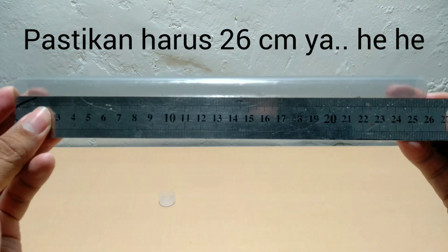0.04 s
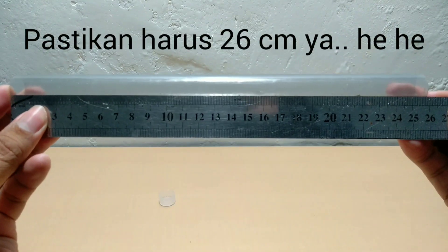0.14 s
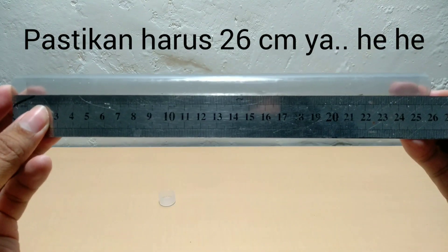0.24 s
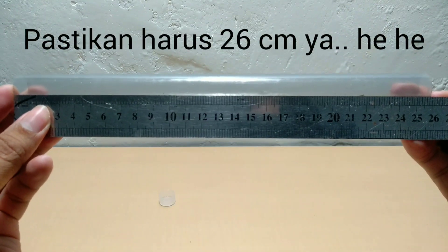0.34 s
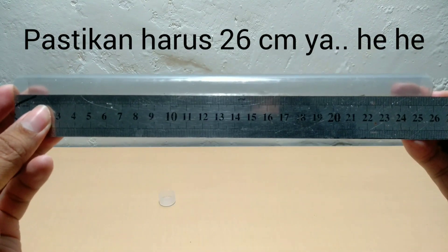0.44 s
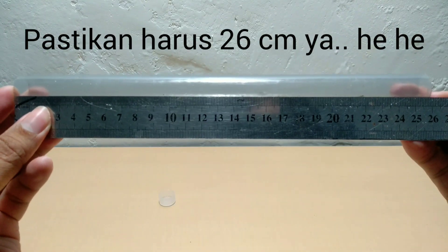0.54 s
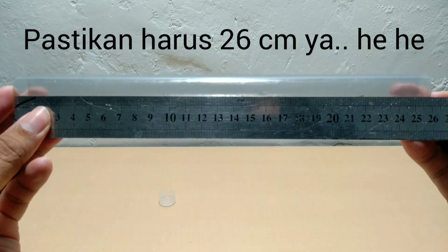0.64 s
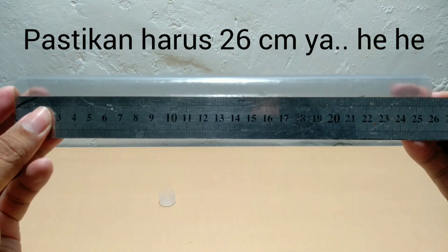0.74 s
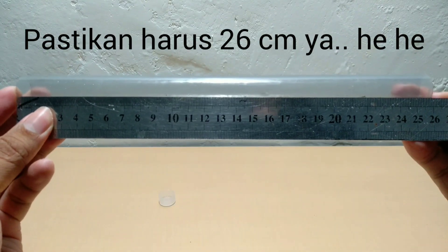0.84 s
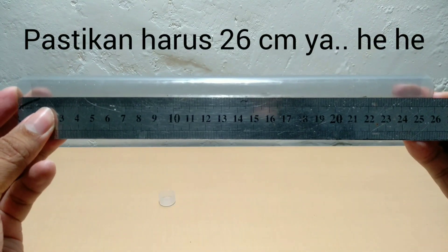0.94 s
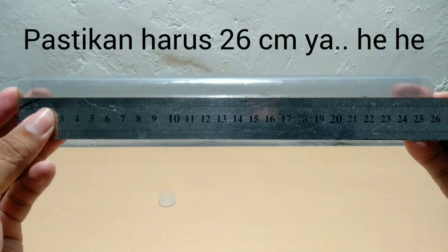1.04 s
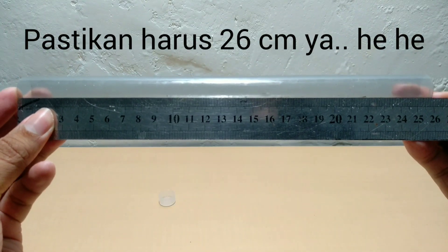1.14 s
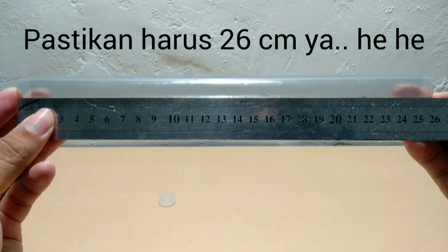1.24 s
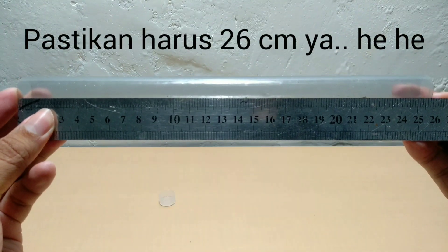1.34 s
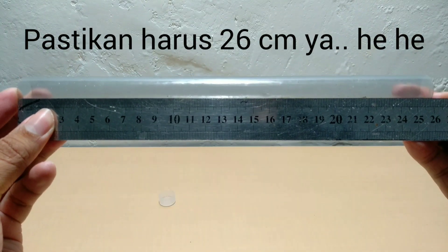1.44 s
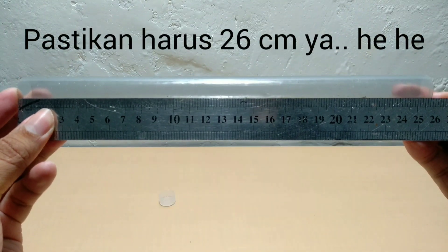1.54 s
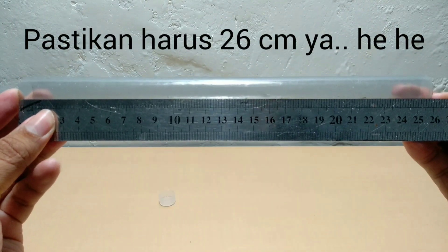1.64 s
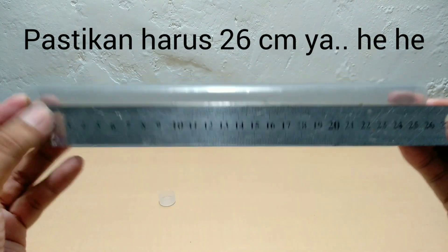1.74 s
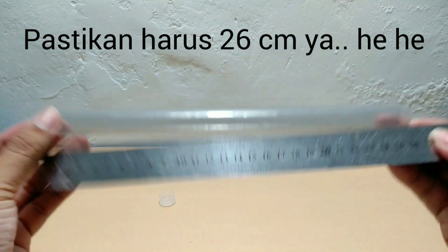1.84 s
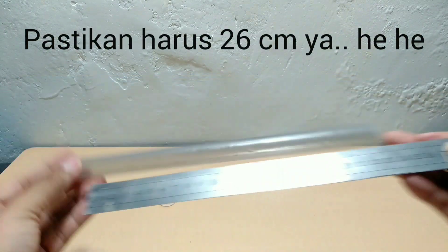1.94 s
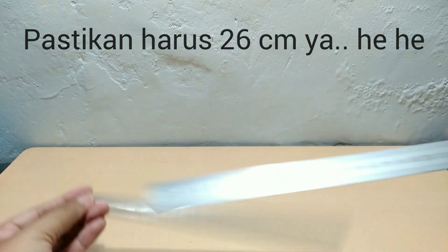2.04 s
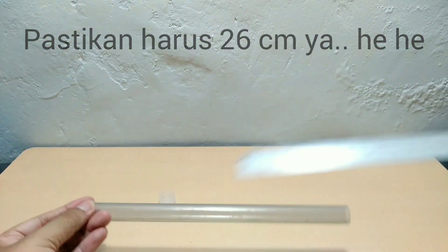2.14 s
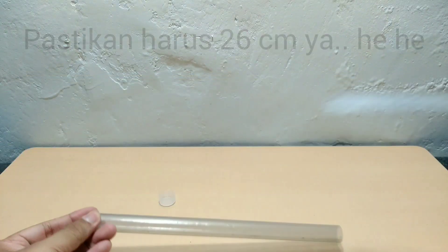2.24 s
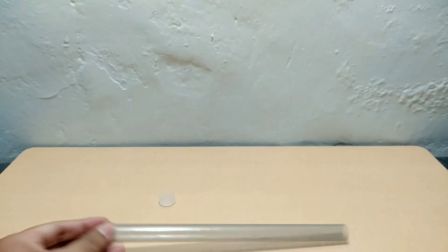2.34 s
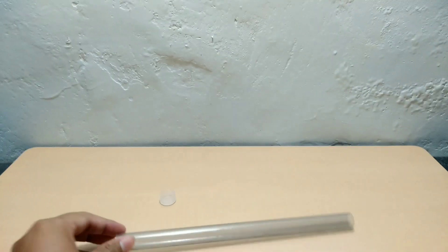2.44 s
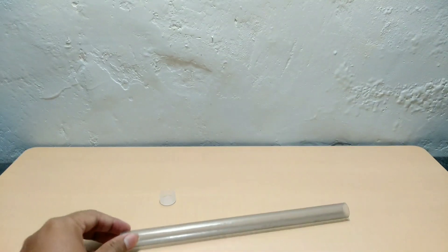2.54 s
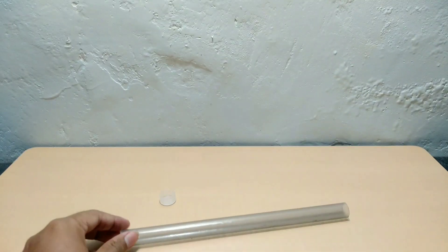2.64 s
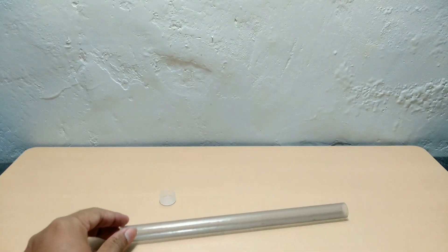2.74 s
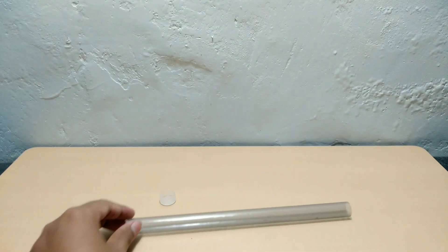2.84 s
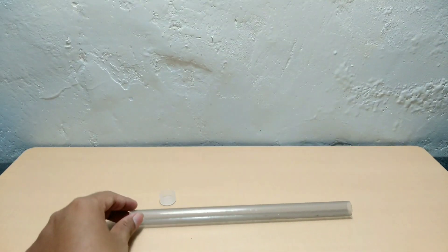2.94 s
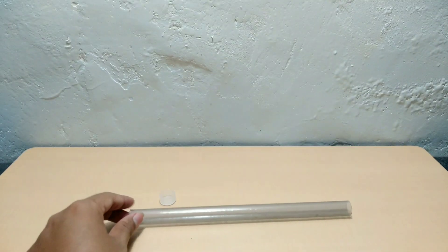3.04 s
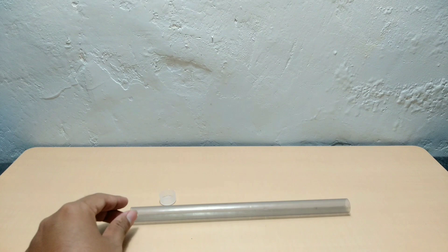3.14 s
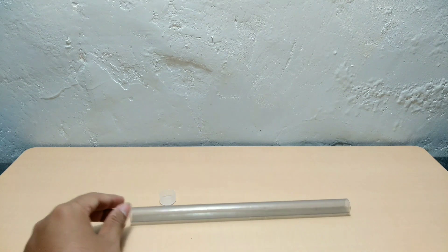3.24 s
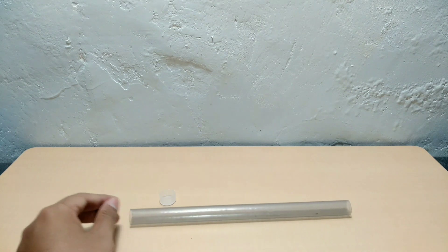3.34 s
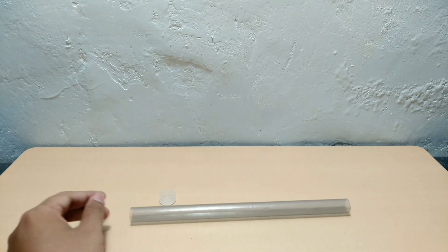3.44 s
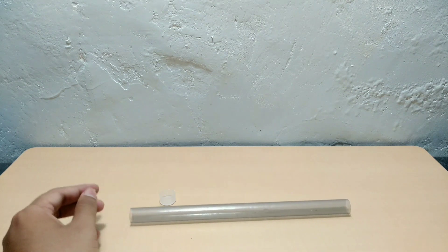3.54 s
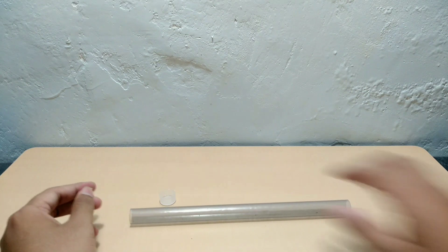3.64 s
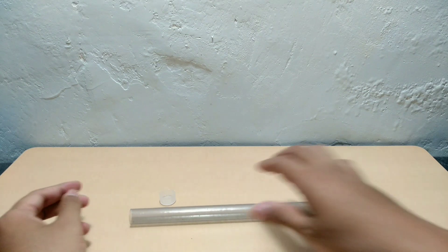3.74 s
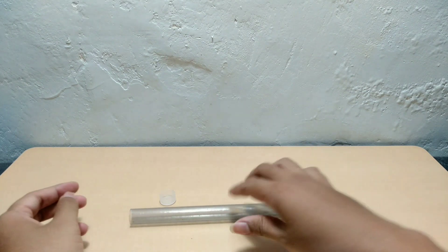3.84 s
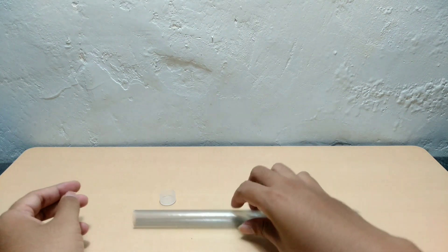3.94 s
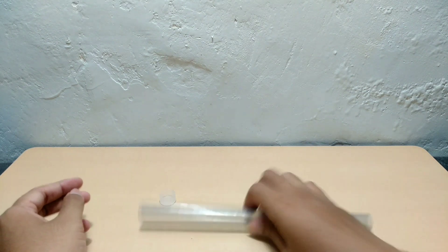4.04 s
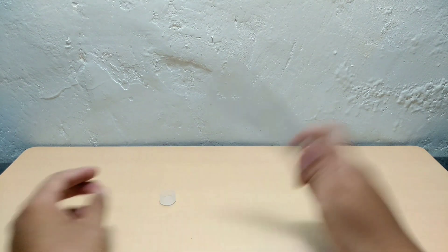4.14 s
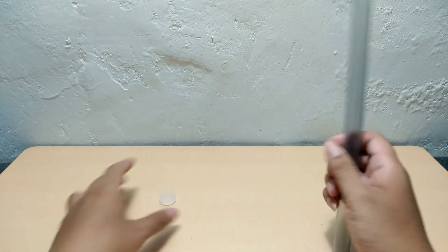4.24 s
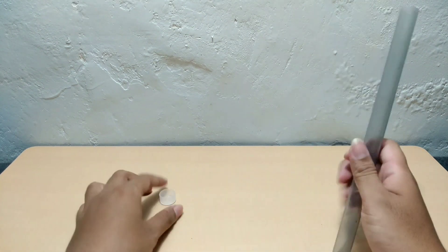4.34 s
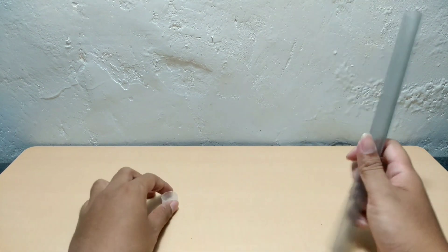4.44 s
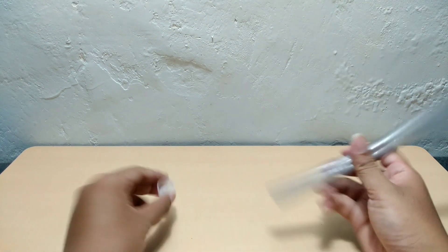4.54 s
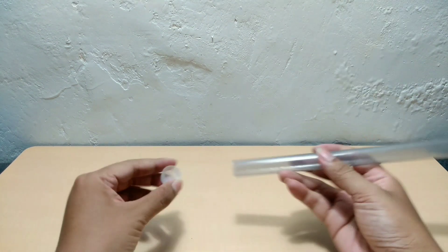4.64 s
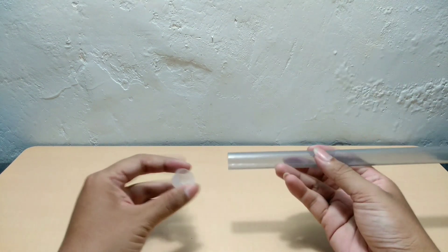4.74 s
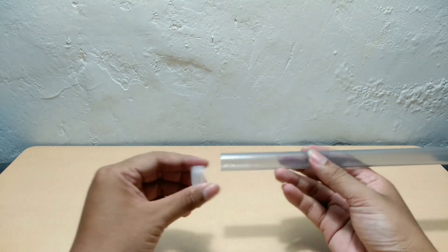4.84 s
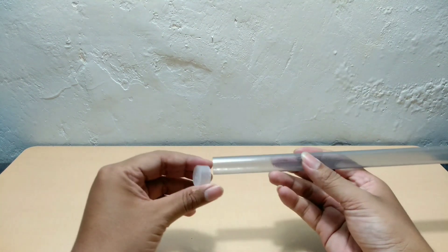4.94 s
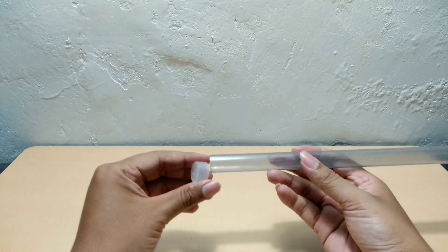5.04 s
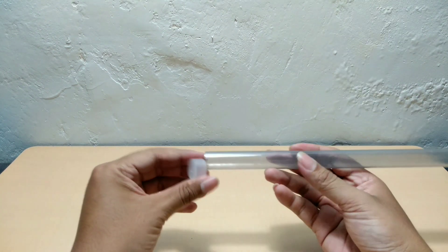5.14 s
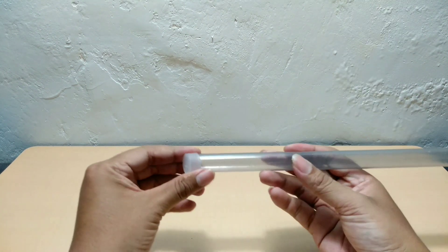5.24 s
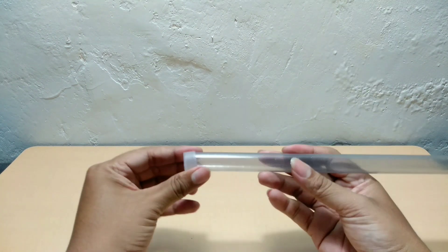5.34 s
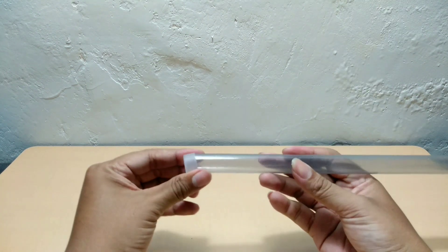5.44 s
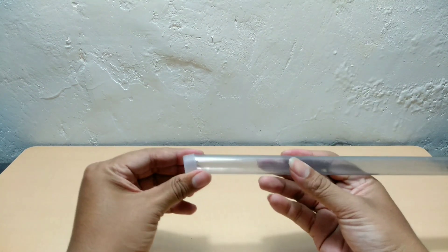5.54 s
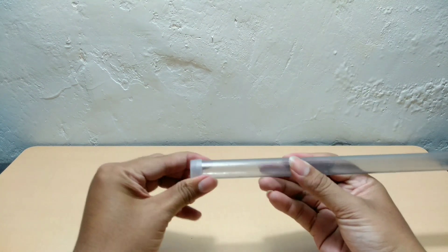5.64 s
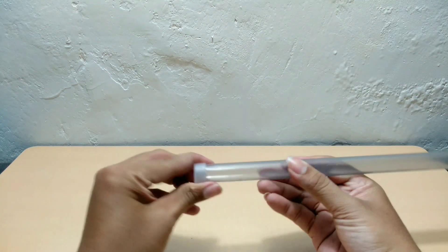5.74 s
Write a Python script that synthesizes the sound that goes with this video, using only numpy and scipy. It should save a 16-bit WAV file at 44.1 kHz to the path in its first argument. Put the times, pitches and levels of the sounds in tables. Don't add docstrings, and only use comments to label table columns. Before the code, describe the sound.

Hands hold a steel ruler and thin plastic pipe with faint ticks and rubs, then part them in two hard metallic clacks. Soft table knocks and brushing follow, a pipe lands flat with a woody slam, fingers fumble, and a cap clicks on with a hollow pop. Small hard room, close phone microphone, low rumble and flickering hiss.

```python
import sys
import numpy as np
from scipy import signal
from scipy.fft import rfft, irfft, next_fast_len
from scipy.io import wavfile
from scipy.ndimage import uniform_filter1d

SR = 44100
rng = np.random.default_rng(int(sys.argv[2]) if len(sys.argv) > 2 else 0)


def bounce(signal):
    frames = np.transpose(np.atleast_2d(signal))
    limited = np.clip(frames, -1, 1)
    pcm = np.round(limited * 32767).astype(np.int16)
    wavfile.write(sys.argv[1], SR, pcm)


def magnitude_from_level(level_db):
    exponent = np.asarray(level_db, float) / 20
    return 10 ** exponent


N = 254765

# start in seconds, peak in dB, softness in dB, left minus right in dB,
# ring length as a factor.
RULER_HITS = [
    (0.769, -40, -9, 7, 0.53),
    (1.914, -29, 8, -0.5, 0.5),
    (1.9288, -9, -1.5, -0.5, 0.68),
    (2.073, -36, -3, 1, 0.77),
    (2.0917, -13.5, -3, -1.5, 0.72),
    (2.135, -17, 0, -1, 0.94),
]
TABLE_HITS = [
    (2.349, -33, 0, -1.5, 0.84),
    (3.479, -45, 22, 1, 0.32),
    (3.833, -26, 2.5, 1, 0.63),
    (3.909, -45, -10, -0.5, 0.43),
    (4.07, -30, 0, 0.45, 0.46),
    (4.278, -42, 8, 1, 0.78),
    (4.345, -44, -6, 1, 0.88),
    (4.454, -36, -13, 1, 0.34),
    (4.596, -43, -16, -1.5, 0.35),
]
SLAM_HITS = [
    (4.062, -13, 0.5, 0.5, 0.5),
    (3.9262, -28, -10, -0.5, 0.38),
]
PIPE_TAPS = [(0.4895, -53, -14, 2, 0.39), (0.786, -52.5, -10, 4, 1), (1.293, -52, 6, 1, 0.94),
             (3.792, -48.5, -8, -1.5, 0.86), (4.328, -54, -6, 18, 1), (4.389, -59, -6, 2, 0.9),
             (4.474, -59, -4, -9, 0.98), (4.479, -49.5, -1, 14, 0.99), (4.609, -55, 1, 18, 0.83),
             (4.729, -67, 1, 11, 0.48), (5.291, -54, 11, 8, 0.18)]
CAP_HITS = [
    (5.414, -28.5, 21, 3, 0.79),
    (5.426, -24.5, -6, 2.5, 0.33),
    (6.5, -44.5, 6, 6, 0.31),
    (5.4195, -34, 17, 1, 0.55),
    (5.439, -43, 18, 1, 0.46),
]
POP_HITS = [
    (5.5632, -32, 0, 1, 0.45),
    (5.5727, -35, 0, 1, .4),
]
PING_HITS = [
    (3.011, -39.5, 0, 4.8, 1),
]
TICKS = [
    (0.5112, -28.5, 7, 4, 0.93),
    (1.151, -46.5, 0, -9, 0.92),
    (1.674, -42, -4, 2, 0.33),
    (3.1564, -35, 0, -8, 0.64),
    (3.8327, -26, 0, -4, 0.26),
    (3.9276, -35, 0, -12, 0.92),
    (4.2785, -32, -8, 0, 0.52),
    (5.426, -52, -1, -1, 0.64),
]

# frequency in Hz, level in dB, 60 dB decay in seconds.
RULER_MODES = [(139.6, 1.5, 0.037), (292, -8.5, 0.053), (517, -6, 0.046), (736, -0.5, 0.035),
               (917, -3, 0.02), (1110, -8.5, 0.027), (1354, -1.5, 0.016), (2630, -9.5, 0.042),
               (3190, 0, 0.014), (3590, 3.5, 0.0087), (3863, 2.5, 0.023), (4440, 1, 0.0074),
               (5600, -14, .01), (8350, -7.5, 0.016), (9380, -6, 0.015), (10100, -8.5, 0.023)]
TABLE_MODES = [(124, 6.5, 0.038), (293, -1.5, 0.075), (510, -12.5, 0.16), (766, 0, 0.037), (994, -3, 0.048),
               (1104, -3.5, 0.025), (1320, -4.5, 0.022), (1980, -25, 0.017), (2760, -18, 0.038),
               (3330, -16, 0.021), (3600, -18, 0.063), (4430, -11, 0.015)]
# frequency in Hz, level in dB, 60 dB decay in seconds.
SLAB_MODES = [(143, -7, 0.05), (305, -5.5, 0.096), (542, -4, 0.059), (757, -3, 0.039), (930, 1.5, 0.025),
              (1050, -3.5, 0.033), (1190, -11, 0.03), (1305, -12, 0.035), (1710, -18, 0.027),
              (2164, -17, 0.044), (2530, -12, 0.05), (3160, -10, 0.015), (3600, -20, .015),
              (4468, -24, 0.022)]
OPEN_PIPE_MODES = [(313, -9, 0.034), (754.5, -2, 0.12), (1270, -11, 0.038)]
# frequency in Hz, level in dB, 60 dB decay in seconds.
CAPPED_PIPE_MODES = [(288, 1.5, 0.026), (324, 7.5, 0.036), (533, -4, .02), (980, -12, 0.079),
                     (1634, -11, 0.067), (2290, -4, 0.03), (3650, -30, 0.012), (4750, -15, 0.0037)]
SEATED_PIPE_MODES = [(345, 0, 0.1), (540, -20.5, .08), (760, -13, 0.042), (1003, -13.5, 0.077),
                     (1666, -21, 0.08), (2240, -32, 0.06)]
PING_MODES = [(2196, -32, .17), (3622, 0, .055), (6070, -9, .04), (8372, -30, .24)]
# frequency in Hz, level in dB, 60 dB decay in seconds.
EDGE_MODES = [(1400, -11, 0.014), (2940, -5.5, 0.01), (3890, 3.5, 0.011), (6100, 7.5, 0.0082),
              (8970, 3.5, 0.0047), (12250, 0, 0.0027)]

# peak time in
# seconds, peak in dB, frequency in Hz, rise in seconds, 60 dB decay in seconds.
RINGS = [(0.513, -42, 6100, .001, .02), (0.514, -44, 3950, .002, .04), (1.681, -44, 3850, .003, 0.028),
         (1.683, -53, 1590, .002, .03), (1.916, -32, 760, .001, .03), (1.9215, -32, 1050, .001, 0.013),
         (2.079, -37, 760, 0.0009, .015), (2.083, -35, 800, .001, 0.012), (3.038, -58, 2216, .008, .2),
         (3.07, -59, 8372, .02, .2), (3.16, -49, 5600, .003, .03), (3.836, -45, 2350, .001, .025),
         (4.096, -38.5, 330, 0.0045, .03), (4.2805, -33, 8000, .0015, .02), (4.281, -39, 5800, .005, .04),
         (4.281, -40, 9000, .002, .03), (4.28, -38, 95, .003, 0.072), (4.331, -47, 733, .003, .04),
         (4.346, -37.5, 307, 0.0024, .04), (4.392, -41.5, 311, .004, .08), (4.456, -38, 311, .004, .06),
         (4.457, -42, 760, .004, 0.033), (4.47, -45, 310, .003, .05), (4.592, -48, 680, .003, .05),
         (4.612, -47.5, 330, .008, .05), (4.613, -50, 730, .003, .06), (4.734, -47, 326, .005, .06),
         (5.295, -48, 748, 0.0017, .05), (5.43, -38.5, 1655, .004, 0.063), (5.481, -49.5, 150, .004, .05),
         (1.9313, -21, 3900, .0005, .01), (1.934, -30, 3200, .001, .015), (1.9325, -26, 800, .001, .015),
            (1.9285, -30, 4500, .001, .01), (2.094, -25, 3800, .0008, .012), (2.096, -29, 3100, .001, .012),
            (2.074, -38, 1200, .002, .02), (2.147, -40, 3850, .002, .03), (2.162, -42, 3850, .003, .03),
            (3.799, -48, 770, .005, .04), (3.846, -40, 130, .004, .05), (3.93, -35, 900, .002, .025),
            (3.931, -40, 2850, .002, .02), (3.929, -42, 1600, .002, .02), (4.0648, -23, 1020, .0007, .008),
            (4.0677, -24, 900, .0008, .008), (4.0717, -24, 550, .001, .012), (4.065, -36, 3300, .001, .012),
            (5.4215, -36, 520, .001, .012), (5.426, -38, 600, .002, .015), (3.03, -62, 3622, .006, .18),
            (1.152, -48, 7800, .001, .02)]

# peak time in seconds, peak in dB, centre in Hz, left minus right in dB, fall in seconds.
CATCHES = [(0.513, -33.5, 9300, 1.5, 0.028), (0.776, -40, 6500, 2, 0.036), (1.297, -43, 6300, -0.5, 0.049),
           (1.9208, -22, 9200, -1, 0.025), (2.0844, -26, 9400, -2.5, 0.019), (2.136, -31.5, 8500, 0, 0.043),
           (3.8347, -36, 6000, 4, 0.017), (3.9263, -30, 6900, 1.5, 0.014), (4.281, -34, 8000, 1, 0.019),
           (4.708, -44, 10300, 2.5, 0.034), (5.4271, -31.5, 8000, 0.5, 0.013),
           (5.5741, -31, 13000, 1, 0.011)]
BRUSHES = [(0.0194, -58, 3190, 0, 0.0051), (1.6844, -42, 9000, 0.5, 0.03),
           (2.354, -40.5, 8900, -0.5, 0.029), (2.5494, -57, 6800, -5, 0.017), (2.9003, -54, 6830, 0, 0.013),
           (2.9644, -44.5, 10900, 1, 0.032), (3.162, -32, 11500, 0.5, 0.017), (3.3994, -51, 4360, 1, 0.023),
           (3.7798, -35, 11000, 0, 0.033), (4.3192, -44, 12800, 1, 0.069), (4.4843, -41, 5600, 0, 0.028),
           (5.0397, -47.5, 7140, -1, 0.039), (5.374, -39.5, 10000, 1.5, 0.042)]
SWISHES = [
    (0.3294, -53, 7050, -5, 0.012),
    (0.9694, -54.5, 9000, -5, 0.024),
    (1.16, -43, 7660, -2, 0.022),
    (1.556, -48, 8700, -1.5, 0.03),
    (2.2358, -44, 10100, 7, 0.014),
    (3.562, -47.5, 8650, -1.0, 0.035),
    (4.392, -45, 8000, -1, 0.039),
    (4.552, -45, 9000, -3, 0.019),
    (5.3294, -41, 6900, -1, 0.024),
]
# frequency in Hz, density in dB per Hz.
RUB_COLOUR = [(290, -57), (500, 12.5), (771, 18.5), (1110, 0), (1370, 6), (3460, -2.5), (3940, -3),
              (7130, -3), (12000, -6.5), (15800, -14)]

# peak time in seconds, peak in dB, rise in seconds,
# fall in seconds (each spans 20 dB), upper modes in dB.
DRAGS = [(2.978, -60, .1, 0.011, 0.5), (3.018, -64, 0.012, 0.0053, 16), (3.48, -53, 0.022, 0.093, -4),
         (3.808, -51.5, 0.051, 0.018, 7), (3.829, -53, .014, 0.0054, 2), (4.09, -52, .006, 0.061, 1),
         (4.43, -54, .06, .06, 3), (4.65, -58, .06, .08, 3), (4.375, -56, .05, .06, 8),
         (4.24, -52.5, 0.033, 0.059, -1), (4.325, -56, 0.026, 0.068, 10), (4.347, -50, 0.031, 0.036, -5),
         (4.394, -52, 0.053, 0.051, -3), (4.47, -46.5, 0.034, 0.075, 6), (4.606, -53, 0.032, 0.06, 7),
         (4.737, -53.5, 0.049, 0.08, -1.5), (5.297, -53.5, 0.013, .05, 11), (5.33, -60, 0.025, 0.14, 5),
         (5.366, -56.5, 0.023, .08, 8), (5.599, -47.5, 0.016, 0.04, -5), (5.644, -66.5, .05, 0.19, 7)]
# frequency in Hz, width in Hz, level in dB.
DRAG_BODY = [(309, 150, -0.5), (487, 27, -9.5), (756, 146, -12), (1120, 93, -25.5)]

# time in seconds, level in dB.
RUMBLE = [(0.0, -64), (0.3, -70.5), (0.66, -60), (0.92, -90), (1.19, -65), (1.51, -70), (1.9, -59.5),
          (2.36, -64.5), (3.2, -66.5), (3.44, -60.5), (3.83, -66), (3.96, -74), (4.25, -55), (4.43, -60),
          (4.7, -64), (5.15, -68.5), (5.42, -61.5), (5.78, -70)]
# frequency in Hz, width in Hz.
DRONES = [(128, 25.6), (172, 28)]
# time in seconds, rise in dB, half length in seconds.
LOWER_SWELLS = [(0.2, 8.5, .35), (0.794, 11.5, 0.24), (1.22, 17, 0.11), (1.7, 4.5, 0.55),
                (2.307, 11.5, 0.12), (3.922, 8.5, 0.14), (4.33, 13, 0.12), (5.42, 5.5, 0.16)]
UPPER_SWELLS = [(0.45, 9.3, 0.12), (1.55, 11.5, 0.15), (1.94, 8.9, 0.19), (2.36, 14.5, 0.046),
                (2.9, 7.2, 0.35), (3.97, 12, 0.082), (4.36, 14, 0.13), (4.7, 17, 0.077), (4.95, 13, 0.18),
                (5.75, 3.6, 0.11)]
RUSTLES = [(1.33, -2.5, 0.18), (2.22, 6, 0.13), (3.0, 2.5, 0.38), (3.83, 5, 0.15), (4.07, 8.5, 0.03),
           (4.7, 4, 0.044), (5.2, 1.5, 0.11)]
# frequency in Hz, density in dB per Hz.
RUMBLE_COLOUR = [(12, -67), (20, -43), (75, -1), (130, -9.5), (178, -6.5), (204, -20), (300, -21),
                 (390, -37.5), (660, -120)]
HISS_COLOUR = [(140, -15.5), (210, -7), (290, -4), (430, -7.5), (520, -8), (600, -12.5), (1100, -13),
               (2400, -15), (3800, -17), (5200, -20.5), (8000, -17), (10500, -21), (13000, -25),
               (15900, -26)]
# frequency in Hz, correlation from -1 to 1.
AIR_LIKENESS = [(60, 0.79), (130, 0.77), (290, 0.59), (640, 0.32), (1410, -0.23), (3100, -0.02),
                (6820, 0.0), (15000, -0.01)]

# frequency in Hz, gain in dB.
PORT_COLOUR = [(4500, 0.5), (6500, -4), (9500, 0.5), (13600, -5.5), (15300, 5)]
# frequency in Hz, spread in dB.
GATE_PATCHES = [(400, 0.9), (1500, 4), (5000, 4), (13000, 3.5)]


def unit(x):
    return x / np.sqrt(np.mean(x ** 2))


def on_log(hz, table):
    f, v = np.transpose(table)
    return np.interp(np.log(hz + 1), np.log(f), v)


def shape(x, gain_at):
    n = next_fast_len(x.shape[-1], real=True)
    hz = np.arange(n // 2 + 1) * SR / n
    return irfft(rfft(x, n) * gain_at(hz), n)[..., :x.shape[-1]]


def resonance(f, hz, width):
    return 1 / (1 + (2 * (f - hz) / width) ** 2)


def decay(t, t60):
    return np.exp(-np.log(1000) * t / t60)


def walk(rate_hz):
    hold = int(SR / rate_hz)
    return uniform_filter1d(np.repeat(rng.standard_normal(N // hold + 1), hold), hold)[:N]


def swells(rest_db, table):
    t = np.arange(N) / SR
    return rest_db + sum(db * np.exp(-((t - s) / half) ** 2) for s, db, half in table)


def add(out, s, pair, pan_db):
    i = int(s * SR)
    a, b = max(i, 0), min(i + pair.shape[1], N)
    out[:, a:b] += pair[:, a - i:b - i] * magnitude_from_level(np.array([[pan_db], [-pan_db]]) / 2)


def blows(hits, modes, bass, treble, push_s, clatter, crack_db, crack_hz, crack_s,
          stray=0.007, swing=-1, lag_s=0):
    out, t = np.zeros((2, N)), np.arange(SR // 4) / SR
    hz, db, t60 = np.transpose(modes)[:, :, None]
    since = np.maximum(t - lag_s * (hz > 2000), 0)
    push = 1 - np.exp(-since / push_s)
    signs = swing ** np.arange(len(modes))[:, None]
    chance = rng.standard_normal((len(hits), 3, len(modes), 1))
    noise = rng.standard_normal((len(hits), 3, len(t)))
    for (s, peak_db, soft_db, pan_db, ring), (size, detune, turn), hiss in zip(hits, chance, noise):
        bass_db = bass[0] + bass[1] * soft_db
        treble_db = treble[0] - treble[1] * soft_db
        tilt = [(150, bass_db), (450, 0), (1500, 0), (4000, treble_db)]
        ringing = magnitude_from_level(db + size + on_log(hz, tilt)) * decay(since, t60 * ring) * push * signs
        phase = 2 * np.pi * hz * (1 + stray * detune) * since
        skew = np.tanh(turn) * np.minimum((hz + 150) / 2200, 1.1)
        body = -np.array([(ringing * np.sin(phase + k * skew)).sum(axis=0) for k in (1, -1)])
        chatter = hiss[2] ** 3 * np.exp(-t / 0.0061) * clatter
        chatter[0] = 1
        body = signal.fftconvolve(body, chatter[None], axes=1)[:, :len(t)]
        body /= np.abs(body).max()
        crack = shape(hiss[:2], lambda f: f / crack_hz / (1 + (f / crack_hz) ** 4))
        crack *= np.exp(-t / (crack_s * ring)) * magnitude_from_level(crack_db + treble_db)
        add(out, s + 0.001022, magnitude_from_level(peak_db) * (body + crack), pan_db)
    return signal.sosfilt(signal.butter(3, 105, "high", fs=SR, output="sos"), out)


def ruler_knocks():
    return blows(RULER_HITS, RULER_MODES, (-3, 0), (0, 1), push_s=0.0003, clatter=0.0054,
                 crack_db=-11, crack_hz=9000, crack_s=0.0098, swing=0.97, lag_s=0.001)


def table_knocks():
    return blows(TABLE_HITS, TABLE_MODES, (0, 1), (1.5, 0), push_s=0.00086, clatter=0.0079,
                 crack_db=-5.5, crack_hz=2000, crack_s=0.0095)


def pipe_slams():
    return blows(SLAM_HITS, SLAB_MODES, (0, 1), (0, 0), push_s=0.0003, clatter=0.002,
                 crack_db=-20, crack_hz=2500, crack_s=0.006, swing=0.98)


def pipe_taps():
    return blows(PIPE_TAPS, OPEN_PIPE_MODES, (0, 1), (-4, 0), push_s=0.0032, clatter=0.0037,
                 crack_db=-30, crack_hz=2500, crack_s=0.004)


def cap_knocks():
    return blows(CAP_HITS, CAPPED_PIPE_MODES, (-10, 0.8), (0, 1), push_s=0.00059, clatter=0.028,
                 crack_db=1.5, crack_hz=3400, crack_s=0.0018)


def cap_pop():
    return blows(POP_HITS, SEATED_PIPE_MODES, (0, 0), (0, 0), push_s=0.0043, clatter=0.001,
                 crack_db=-30, crack_hz=3000, crack_s=0.004, swing=1)


def ping():
    return blows(PING_HITS, PING_MODES, (0, 0), (0, 0), push_s=0.012, clatter=0,
                 crack_db=-40, crack_hz=3000, crack_s=0.004, stray=0)


def edge_ticks():
    return blows(TICKS, EDGE_MODES, (-9, 1), (-0.7, 0), push_s=0.0001, clatter=0.034,
                 crack_db=-19.5, crack_hz=8000, crack_s=0.0054)


def rings():
    out = np.zeros((2, N))
    for s, peak_db, hz, rise, t60 in RINGS:
        t = np.arange(-int(3 * rise * SR), int(t60 * SR)) / SR
        swell = np.where(t < 0, np.exp(-(t / rise) ** 2), decay(t, t60))
        skew = min(hz / 4000, 0.8) * np.array([[1], [-1]])
        add(out, s + t[0], magnitude_from_level(peak_db) * swell * np.cos(2 * np.pi * hz * t + skew), 0)
    return out


def rubs():
    out, t = np.zeros((2, N)), np.arange(-SR // 10, SR // 5) / SR
    kinds = [(CATCHES, 0.013, 1.57), (BRUSHES, 0.023, 1.57), (SWISHES, 0.017, 25)]
    slips = sorted((*row, rise, below_db) for table, rise, below_db in kinds for row in table)
    noise = rng.standard_normal((len(slips), 2, len(t)))
    sizes = rng.exponential(size=(len(slips), len(t)))
    for (s, peak_db, hz, pan_db, fall, rise, below_db), pair, size in zip(slips, noise, sizes):
        above_db = max(below_db, 8.5)

        def colour(f):
            loss_db = np.where(f < hz, below_db, above_db) * np.log2((f + 1) / hz) ** 2
            return magnitude_from_level(on_log(f, RUB_COLOUR) - loss_db)

        grains = (pair + 0.25 * pair[::-1]) * magnitude_from_level(2.2 * np.minimum(size, 7))
        swell = np.where(t < 0, np.exp(-(t / rise) ** 2), np.exp(-t / fall))
        add(out, s + t[0], unit(shape(grains, colour)) * swell * magnitude_from_level(peak_db - 11.5), pan_db)
    return out


def drag():
    slips = rng.standard_normal(N) * magnitude_from_level(2.0 * walk(50))

    def ring(body):
        return shape(slips, lambda f: sum(magnitude_from_level(db) * resonance(f, hz, w) for hz, w, db in body) * f / (f + 90))

    low, high = ring(DRAG_BODY[:2]), ring(DRAG_BODY[2:])
    time, gain = np.arange(N) / SR, np.zeros((2, N))
    for s, peak_db, rise, fall, upper_db in DRAGS:
        db = peak_db - 20 * np.maximum((s - time) / rise, (time - s) / fall)
        gain = np.maximum(gain, magnitude_from_level([db, db + upper_db]))
    moving = np.array([low, high]) * uniform_filter1d(gain, size=200)
    wood = moving.sum(axis=0) / np.std(low + high)
    return wood * magnitude_from_level([[-0.6], [0.6]])


def room_tail():
    t = np.arange(SR // 3) / SR
    mid, side = rng.standard_normal((2, len(t))) * decay(t, 0.11) * (t > 0.002)
    side = shape(side, lambda f: f / np.hypot(f, 900))
    tail = shape(np.array([mid + side, mid - side]), lambda f: 1 / np.hypot(1, f / 6500))
    return tail * magnitude_from_level(-10) / np.sqrt((tail ** 2).sum(axis=1, keepdims=True))


def in_room(x, tail):
    return x + signal.fftconvolve(x, tail, axes=1)[:, :N]


def air():
    def likeness(f):
        return np.clip(on_log(f, AIR_LIKENESS), -0.95, 0.95)

    mid = shape(rng.standard_normal(N), lambda f: np.sqrt(1 + likeness(f)))
    side = shape(rng.standard_normal(N), lambda f: np.sqrt(1 - likeness(f)))
    pair = np.array([mid + side, mid - side])
    rumble = unit(shape(pair, lambda f: magnitude_from_level(on_log(f, RUMBLE_COLOUR)) / (1 + (f / 120) ** 4)))
    hiss = unit(shape(pair, lambda f: magnitude_from_level(on_log(f, HISS_COLOUR))))
    lower, upper = (unit(shape(pair, lambda f: resonance(f, hz, w))) for hz, w in DRONES)
    lower_db = swells(-72, LOWER_SWELLS) + 2.5 * walk(9)
    upper_db = swells(-76, UPPER_SWELLS) + 1.5 * walk(9)
    rumble_db = np.interp(np.arange(N) / SR, *np.transpose(RUMBLE)) + 4.3 * walk(23.87)
    hiss_db = swells(-62.5, RUSTLES) + 1.84 * walk(11.0)
    return rumble * magnitude_from_level(rumble_db) + lower * magnitude_from_level(lower_db) + upper * magnitude_from_level(upper_db) + hiss * magnitude_from_level(hiss_db)


def port(x):
    return shape(x, lambda f: magnitude_from_level(on_log(f, PORT_COLOUR)))


def gate(x):
    hz, _, cells = signal.stft(x, SR, nperseg=1024)
    bands = (np.sqrt(hz) / 1.6).astype(int)
    chance = rng.standard_normal((bands[-1] + 1, cells.shape[-1]))
    patches = uniform_filter1d(chance, size=3)[bands] * np.sqrt(3)
    patches -= 3.4 * np.maximum(-patches - 1.2, 0)
    cells = cells * magnitude_from_level(on_log(hz, GATE_PATCHES)[:, None] * patches)
    return signal.istft(cells, SR, nperseg=1024)[1][:, :N]


def scene():
    knocks = ruler_knocks() + table_knocks() + pipe_taps() + cap_knocks() + ping() + edge_ticks()
    slips = rubs() + drag()
    tail = room_tail()
    soft = gate(port(in_room(slips, tail)) + air())
    knocks += pipe_slams() + cap_pop() + rings()
    return port(in_room(knocks, tail)) + soft


def low_pass(x):
    return signal.sosfilt(signal.butter(12, 15920, fs=SR, output="sos"), x)


def record(dry):
    return low_pass(dry)


dry = scene()
out = record(dry)
bounce(out)
```